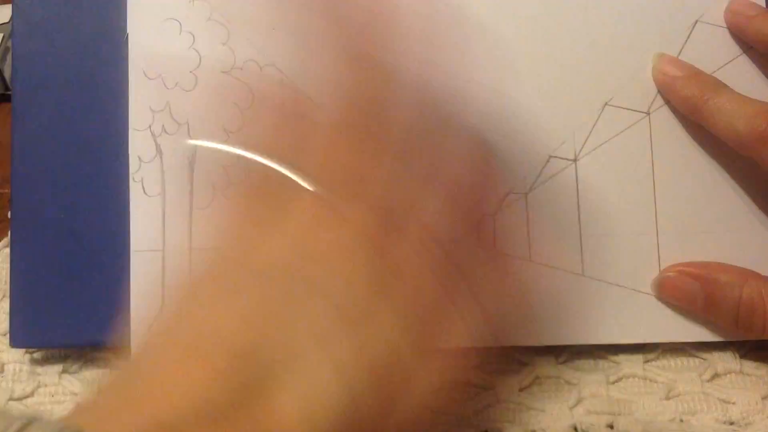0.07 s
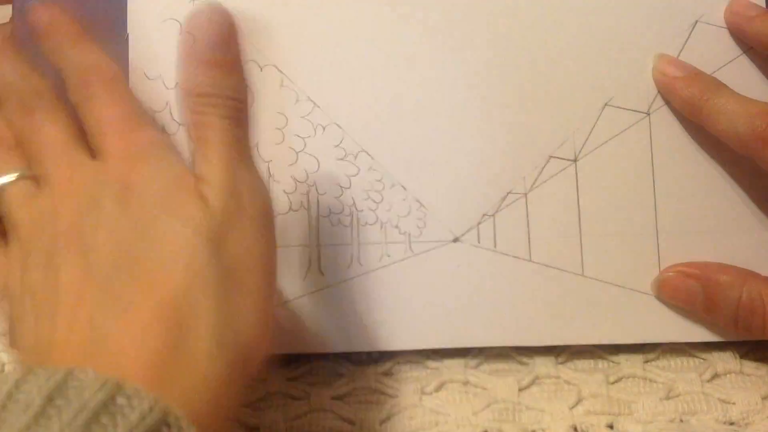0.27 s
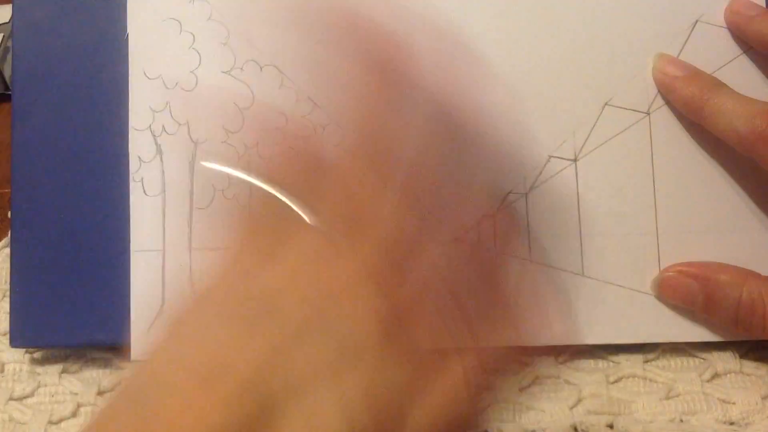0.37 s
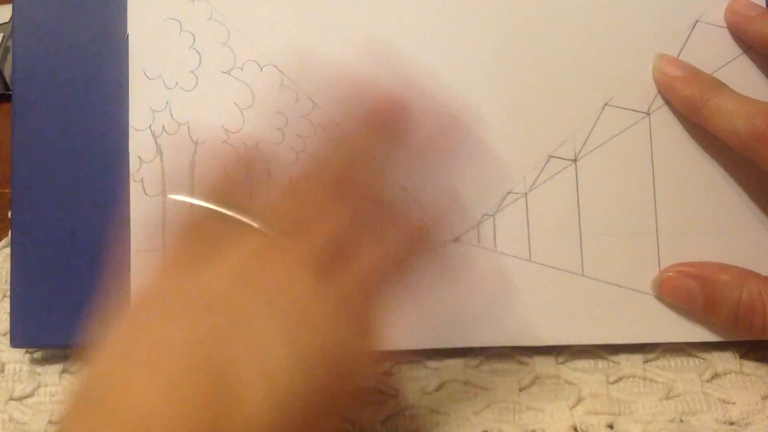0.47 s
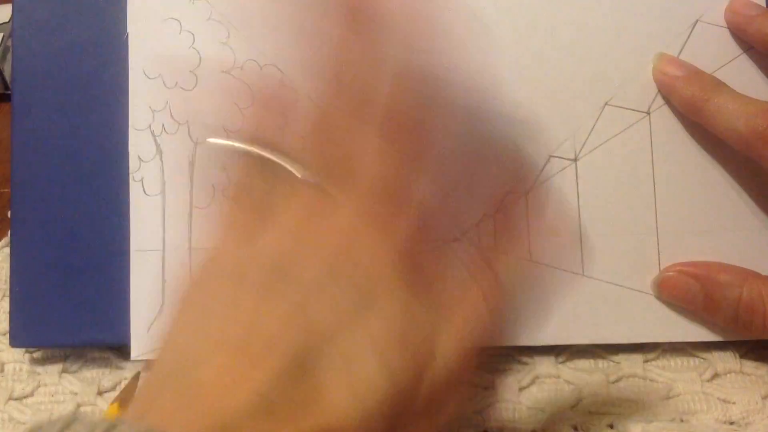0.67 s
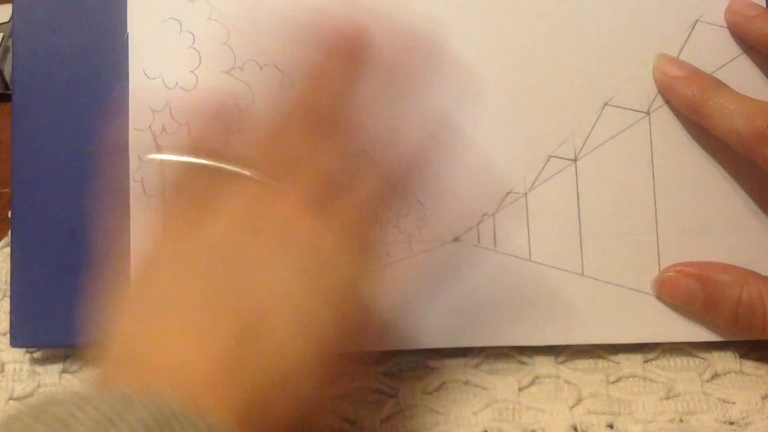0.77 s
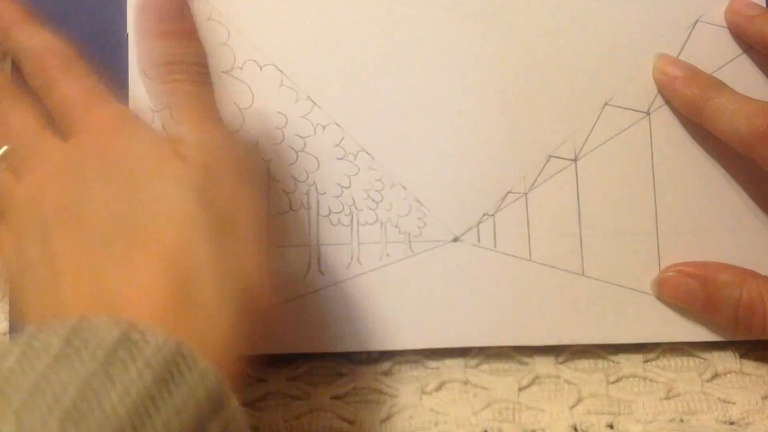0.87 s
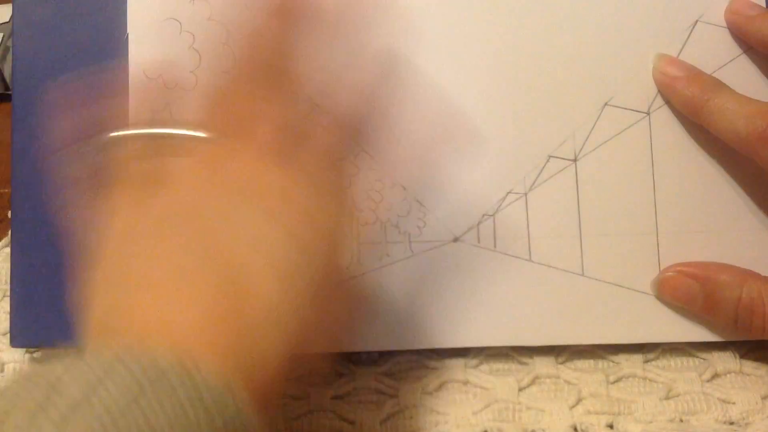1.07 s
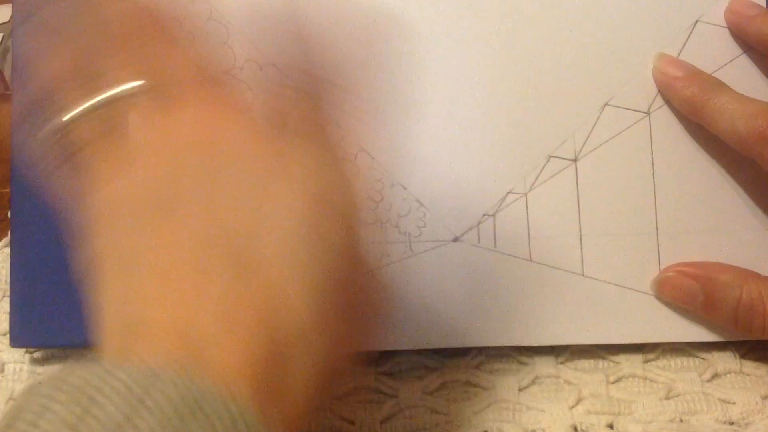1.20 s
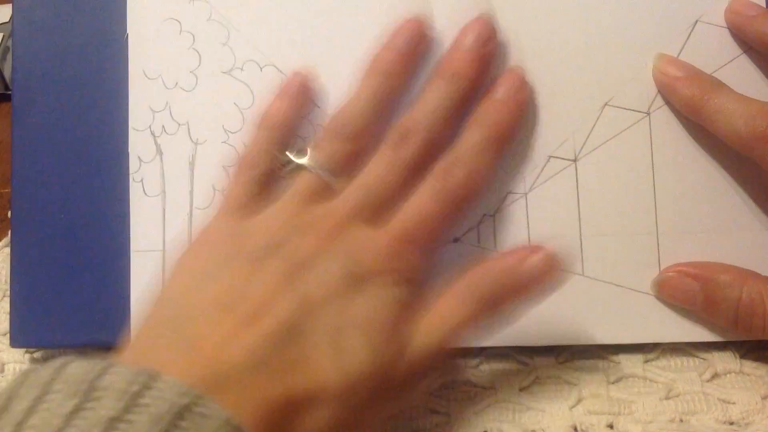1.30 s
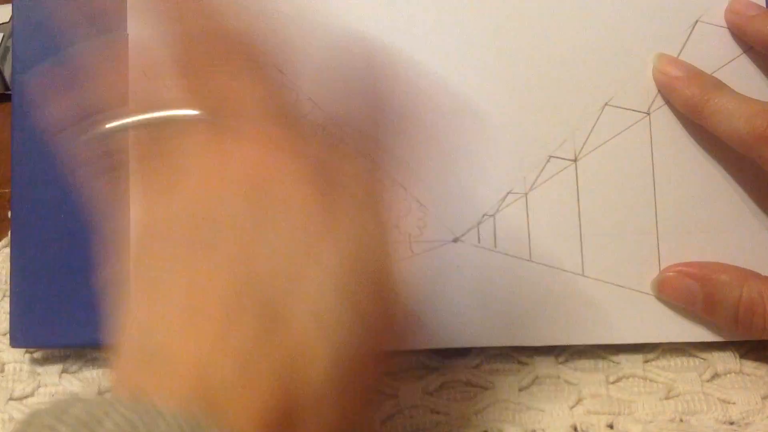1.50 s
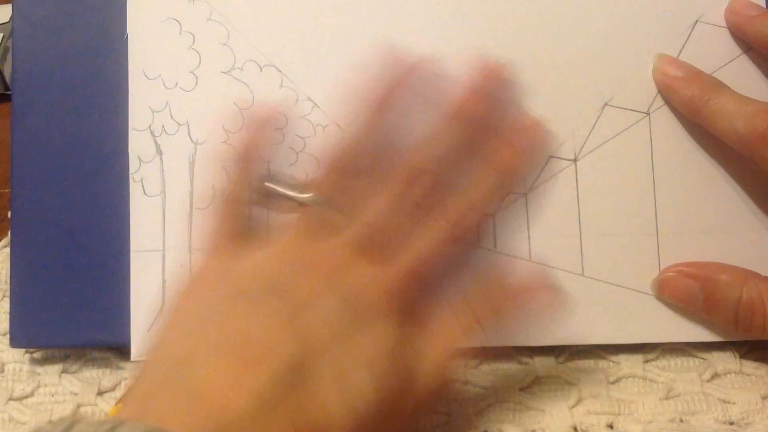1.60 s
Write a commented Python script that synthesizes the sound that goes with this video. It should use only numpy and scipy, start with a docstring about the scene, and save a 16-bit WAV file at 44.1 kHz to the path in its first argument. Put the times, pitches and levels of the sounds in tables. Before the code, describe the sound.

A hand brushes a sheet of paper on a table in six quick, hissing swishes. The fingers land with light taps and hollow thumps that grow stronger toward the end, heard close up in a quiet room.

```python
"""Hand brushing drawing paper.

A hand sweeps a sheet on a table about 3.5 times a second, in a quiet room. The fingers land with
a paper tick, a slap and a hollow table knock. Skin on paper swells into a fine hiss, which dies
away as the fingers flick off. Dull room noise and faint hums lie below."""
import sys
import numpy as np
from scipy import signal
from scipy.fft import rfft, irfft
from scipy.io import wavfile

SR = 44100
rng = np.random.default_rng(int(sys.argv[2]) if len(sys.argv) > 2 else 0)


def bounce(signal):
    """Save signal as a 16-bit WAV file at the path given by the first command-line argument."""
    frames = np.transpose(np.atleast_2d(signal))
    limited = np.clip(frames, -1, 1)
    pcm = np.round(limited * 32767).astype(np.int16)
    wavfile.write(sys.argv[1], SR, pcm)


N = 72765
TIME_S = np.arange(N) / SR

# Hand strokes: start/s, lift/s, start level/dB, full-pressure level/dB
STROKES = [(-0.11, 0.007, -52, -44), (0.204, 0.309, -49, -45.5), (0.5, 0.598, -47.5, -45.5),
           (0.788, 0.887, -54.5, -44.5), (1.082, 1.17, -53.5, -45.5), (1.354, 1.468, -61, -45.5)]
# Skin-on-paper hiss: f/Hz, relative density/dB
HISS_SPECTRUM = [(1000, -13.5), (1800, -10), (2800, -10), (4200, -7.5), (6500, -3.5), (9000, -1),
                 (12000, 0.5), (15500, 0)]
# Murmur of the rubbed table: f/Hz, relative density/dB
MURMUR_SPECTRUM = [(60, -51), (120, 0), (220, -11.5), (335, 9), (470, -10), (680, -5), (1000, -32),
                   (2000, -48.5)]
# Finger landings: t/s, knock/dB, upper-mode gain/dB, mode pitch ratio, slap pitch/Hz, slap/dB, tick/dB
LANDINGS = [(0.2055, -38, 2, 0.98, 2020, -56, -43), (0.2138, -30, -5, .985, 2000, -52, -46),
            (0.4857, -36.5, 4, 0.94, 2000, -54, -40), (0.4952, -30.5, -6.5, 1.02, 1990, -54, -35),
            (0.784, -26.5, -0.5, 1.009, 2100, -49, -37), (1.0732, -18.5, 6.5, 0.984, 1880, -41.5, -40),
            (1.366, -19, -1.5, 0.98, 2300, -51.5, -36.5)]
# Modes of table and pad: f/Hz, relative level/dB, T60/s
TABLE_MODES = [(194, -12.5, 0.088), (304, 5, 0.033), (340.5, 4, 0.064), (603.4, -1.5, 0.024),
               (665.3, -3, 0.033), (1020, -18.5, 0.031)]
# Paper tick: f/Hz, relative density/dB
TICK_SPECTRUM = [(700, -36), (2000, 2.5), (3200, -8), (6000, 0), (10000, 10.5), (15500, 0)]
# Paper slap: f/pitch, relative density/dB
SLAP_SHAPE = [(.15, -25), (.28, -11), (.42, -16), (.58, 2), (.8, -10.5), (1, 2), (1.2, -12), (1.6, -12.5),
              (4, -14)]
# Fingertips leaving the sheet: t/s, level/dB, pitch/Hz
FLICKS = [(0.0248, -46.5, 3950), (0.2922, -50, 5700), (0.608, -45.5, 3800), (0.878, -50, 6100),
          (0.894, -41.5, 5360), (1.1594, -50, 6500), (1.1796, -46.5, 4400), (1.4653, -52, 6000),
          (1.4874, -48, 3630)]
# Fingertip scuff: f/pitch, relative density/dB
FLICK_SHAPE = [(.25, -26.5), (.7, -9.5), (1, 0.5), (1.4, -10.5), (3, -10)]
# Room noise: f/Hz, relative density/dB
ROOM_SPECTRUM = [(25, -34), (60, -36), (85, -25.5), (115, -15), (160, -3), (230, -0.5), (330, -3),
                 (460, -11.5), (720, -13), (950, -17.5), (1500, -23.5), (2200, -26.5), (3200, -32),
                 (8000, -32.5), (15500, -35.5)]
# Room hums: f/Hz, level/dB
ROOM_HUMS = [(120, -67.5), (211, -61.5), (248, -60), (534, -71.5), (733, -71.5)]


def sweeps():
    """Skin slides on paper: grainy hiss and low murmur swell with pressure, fade as the hand lifts."""
    attack_s, swell_exponent, release_db_per_s = 0.007, 1.5, 420
    grains_per_s, grain_spread_db, grain_db = 4600, 0.5, 6
    flutter_db, murmur_db = 1.05, -9.5
    pressure = np.zeros(N)
    for start_s, lift_s, start_db, full_db in STROKES:
        remaining = np.clip(1 - (TIME_S - start_s) / (lift_s - start_s), 0, 1)
        swell_db = full_db + (start_db - full_db) * remaining ** swell_exponent
        attack = 1 - np.exp(-since(start_s) / attack_s)
        pressure += attack * from_db(swell_db - release_db_per_s * since(lift_s))
    # Grains: paper fibres catching on the skin.
    sizes = from_db(grain_spread_db * np.minimum(rng.exponential(1, N), 5))
    signs = rng.choice([-1, 1], N)
    catches = rng.random(N) < grains_per_s / SR
    grains = from_db(grain_db) * rms_one(sizes * signs * catches)
    hiss = colour(rng.standard_normal(N) + grains, HISS_SPECTRUM)
    flutter = from_db(flutter_db * drift(rate_hz=46))
    murmur = from_db(murmur_db) * noise(MURMUR_SPECTRUM)
    return pressure * flutter * (hiss + murmur)


def knocks():
    """Soft landings ring the table; the spot sets the pitch and the share of the upper modes."""
    rise_s, upper_above_hz = 0.0032, 480
    ring = np.zeros(N)
    for start_s, knock_db, upper_db, pitch_ratio, *_ in LANDINGS:
        age_s = since(start_s)
        rise = (1 - np.exp(-age_s / rise_s)) ** 2
        for hz, mode_db, t60_s in TABLE_MODES:
            share = from_db(upper_db) if hz > upper_above_hz else -1  # upper modes in antiphase
            envelope = from_db(knock_db + mode_db) * rise * decay(start_s, t60_s)
            ring += share * envelope * np.sin(2 * np.pi * hz * pitch_ratio * age_s)
    return high_pass(ring, hz=140)


def ticks():
    """Skin grazes the sheet, then meets it with a bright tick."""
    graze_lead_s, graze_db, tick_lag_s = 0.0023, -9, 0.001
    envelope = np.zeros(N)
    for start_s, *_, tick_db in LANDINGS:
        envelope += from_db(tick_db + graze_db) * decay(start_s - graze_lead_s, t60_s=0.0053)
        envelope += from_db(tick_db) * decay(start_s + tick_lag_s, t60_s=0.009)
    return envelope * noise(TICK_SPECTRUM)


def slaps():
    """The sheet flaps against the pad under each landing finger; the spot sets the pitch."""
    return sum(from_db(slap_db) * decay(start_s, t60_s=0.069) * pitched_noise(SLAP_SHAPE, pitch_hz)
               for start_s, *_, pitch_hz, slap_db, _ in LANDINGS)


def flicks():
    """Fingertips scuff the paper as they leave and stir the table."""
    murmur = from_db(-2) * noise(MURMUR_SPECTRUM)
    return sum(from_db(db) * decay(start_s, t60_s=0.019) * (pitched_noise(FLICK_SHAPE, pitch_hz) + murmur)
               for start_s, db, pitch_hz in FLICKS)


def echoes(x):
    """Faint, short tail of a furnished room."""
    tail = rng.standard_normal(N) * decay(start_s=0.017, t60_s=0.19)
    return from_db(-18) * signal.fftconvolve(x, tail / np.linalg.norm(tail))[:N]


def room_tone():
    """Dull steady noise and faint, wavering hums."""
    wander_hz = 2.67
    tone = from_db(-52.5) * noise(ROOM_SPECTRUM)
    for hz, db in ROOM_HUMS:
        cycles = np.cumsum(hz + wander_hz * drift(rate_hz=4.24)) / SR
        tone += from_db(db) * rms_one(np.sin(2 * np.pi * cycles))
    return tone


def from_db(db):
    """Decibels to gain."""
    return 10 ** (np.asarray(db) / 20)


def rms_one(x):
    """Scale to rms 1."""
    return x / np.sqrt(np.mean(x ** 2) + 1e-20)


def colour(x, spectrum):
    """Shape x by a spectrum (f/Hz, density/dB); rms 1."""
    hz, db = np.transpose(spectrum)
    bins_hz = np.maximum(np.fft.rfftfreq(N, 1 / SR), 1)
    gain = from_db(np.interp(np.log(bins_hz), np.log(hz), db))
    return rms_one(irfft(rfft(x) * gain, N))


def noise(spectrum):
    """Coloured noise; rms 1."""
    return colour(rng.standard_normal(N), spectrum)


def pitched_noise(shape, pitch_hz):
    """Noise with its spectral shape scaled to a pitch; rms 1."""
    return noise([(ratio * pitch_hz, db) for ratio, db in shape])


def drift(rate_hz):
    """Random wander: two-pole low-passed noise; rms 1."""
    pole = np.exp(-2 * np.pi * rate_hz / SR)
    wander = signal.lfilter([1], [1, -2 * pole, pole * pole], rng.standard_normal(2 * N))
    return rms_one(wander[N:])


def since(start_s):
    """Seconds since start_s; 0 before."""
    return np.maximum(TIME_S - start_s, 0)


def decay(start_s, t60_s):
    """Step to 1, then fall 60 dB per t60_s."""
    return (TIME_S >= start_s) * np.exp(-np.log(1000) * since(start_s) / t60_s)


def high_pass(x, hz):
    """Second-order bass cut."""
    return signal.sosfilt(signal.butter(2, hz, "high", fs=SR, output="sos"), x)


def scene():
    """Close hand, its echoes and room tone; mono."""
    hand = high_pass(sweeps() + knocks() + slaps() + ticks() + flicks(), hz=76)
    return (hand + echoes(hand) + room_tone())[None]


def record(dry):
    """Steep treble cut."""
    cutoff_hz = 15400
    return signal.sosfilt(signal.ellip(12, 0.1, 70, cutoff_hz, fs=SR, output="sos"), dry)


dry = scene()
out = record(dry)
bounce(out)
```